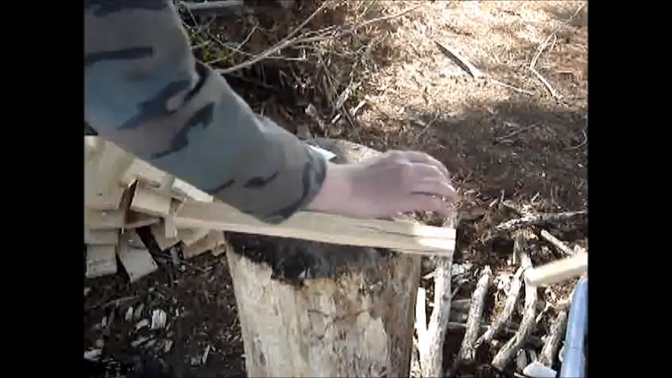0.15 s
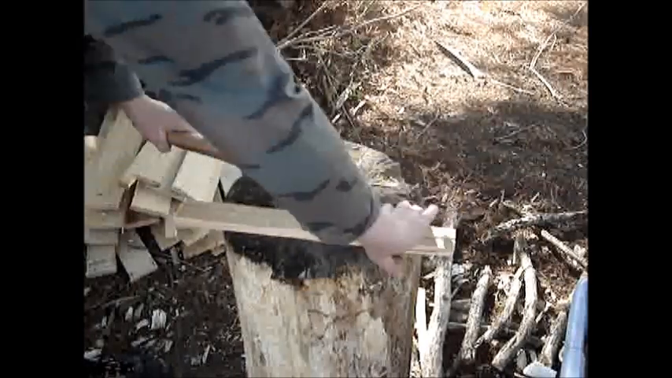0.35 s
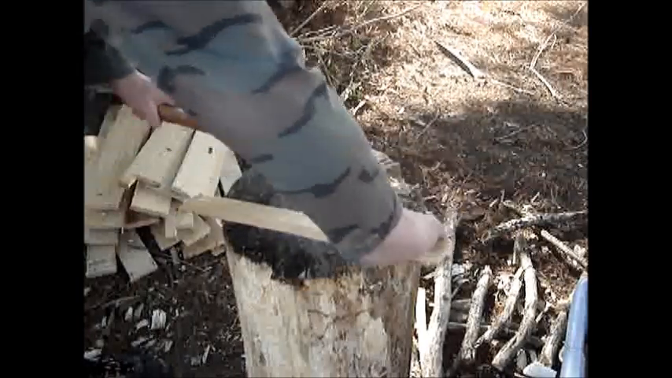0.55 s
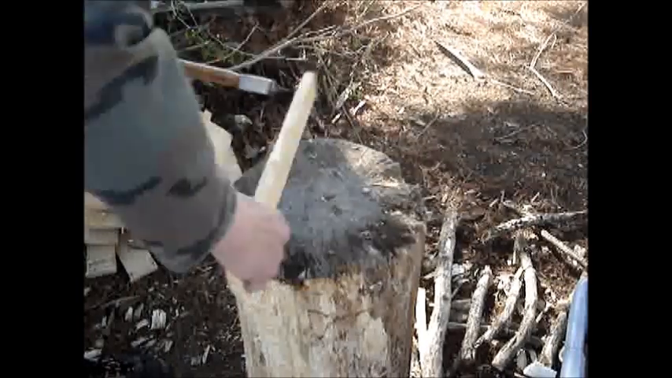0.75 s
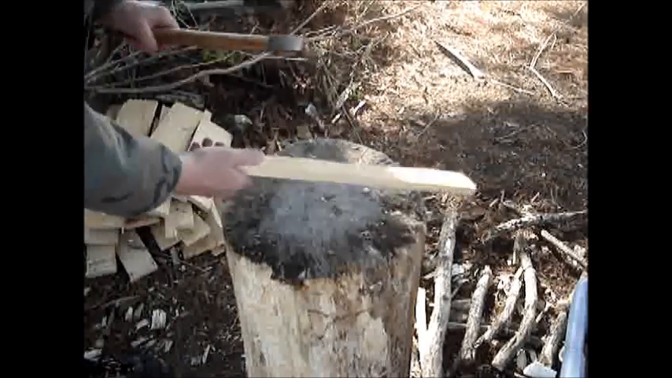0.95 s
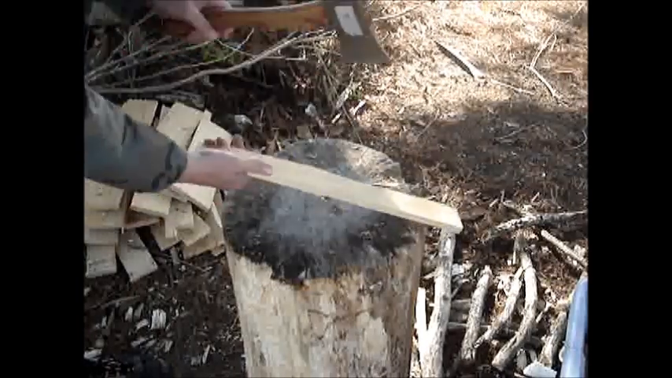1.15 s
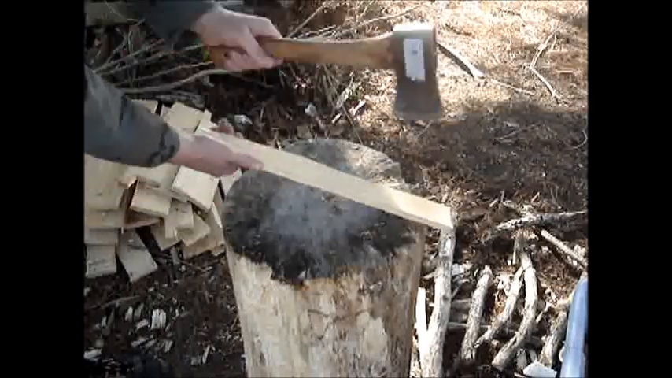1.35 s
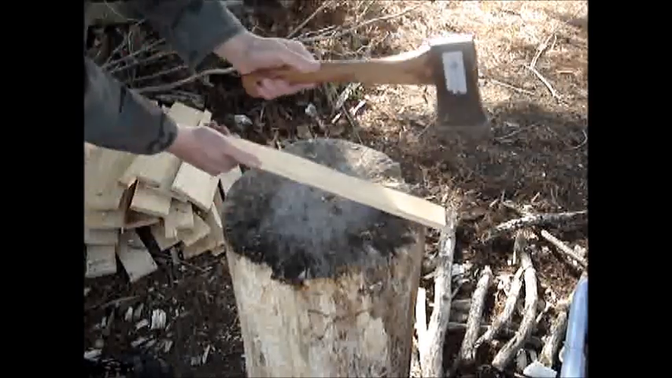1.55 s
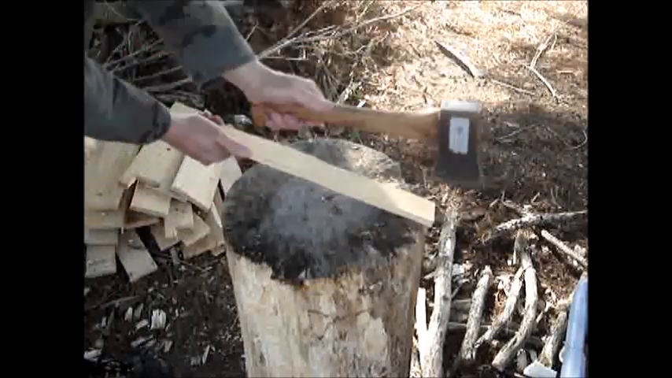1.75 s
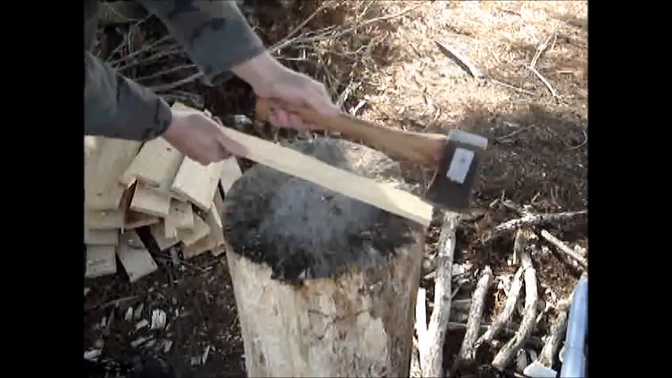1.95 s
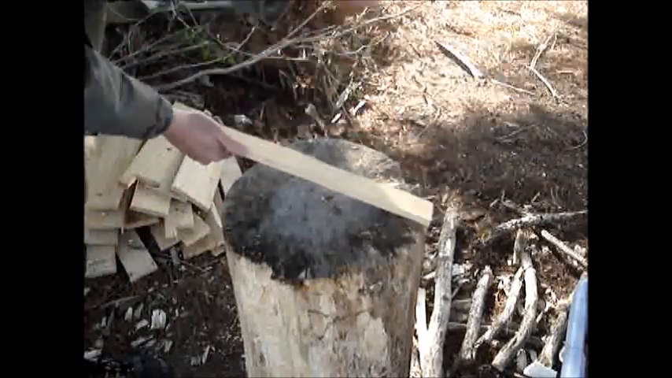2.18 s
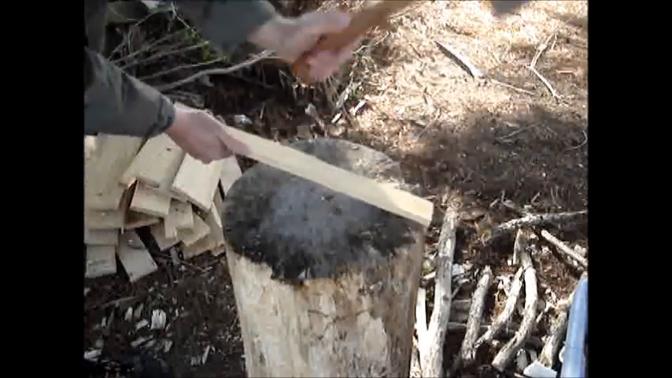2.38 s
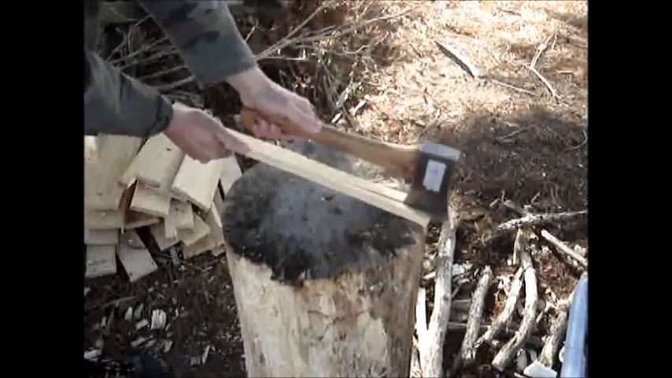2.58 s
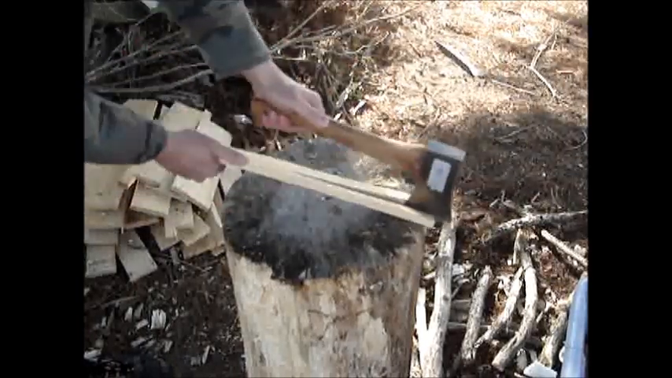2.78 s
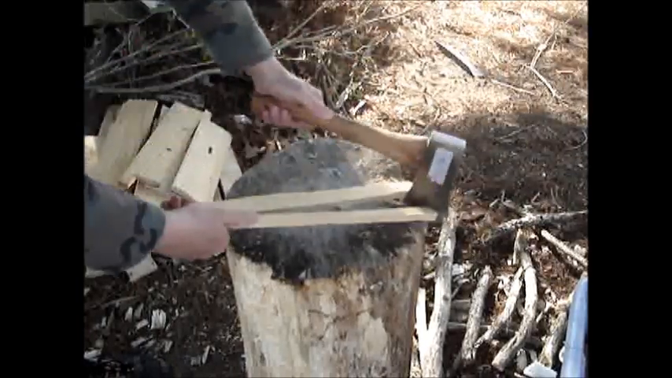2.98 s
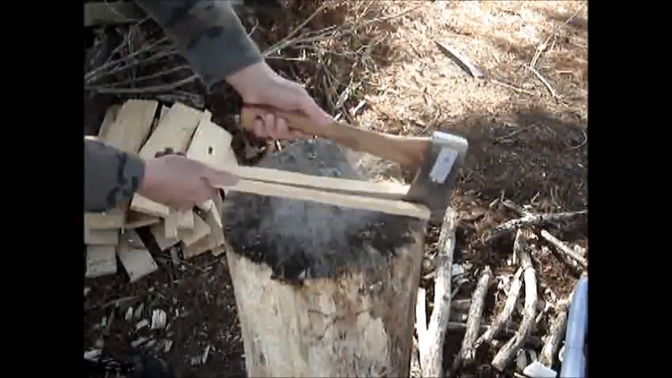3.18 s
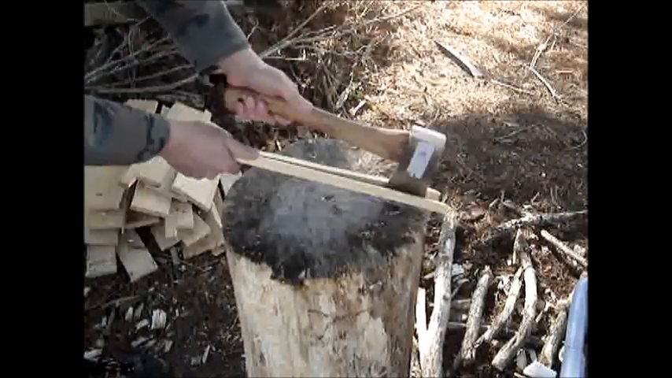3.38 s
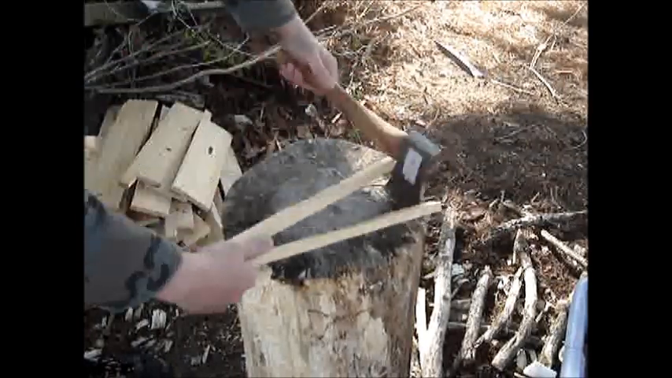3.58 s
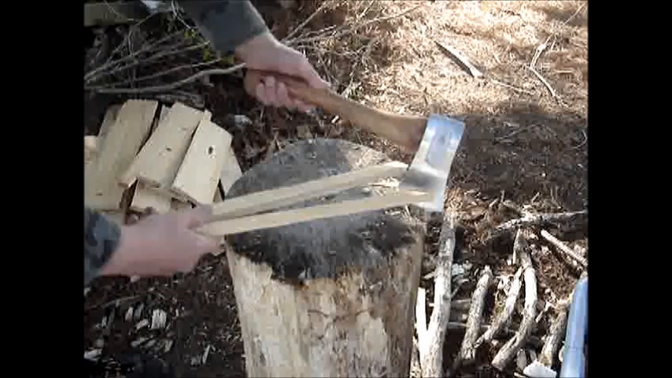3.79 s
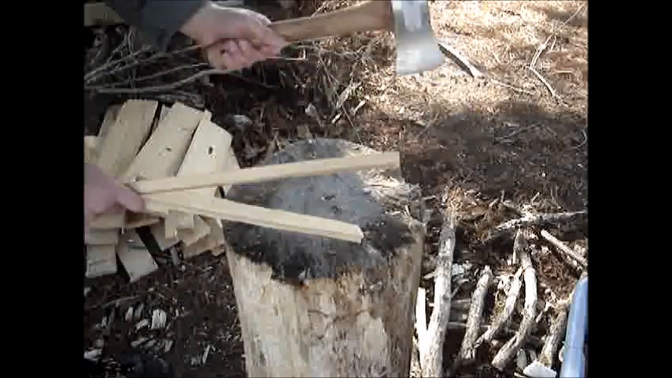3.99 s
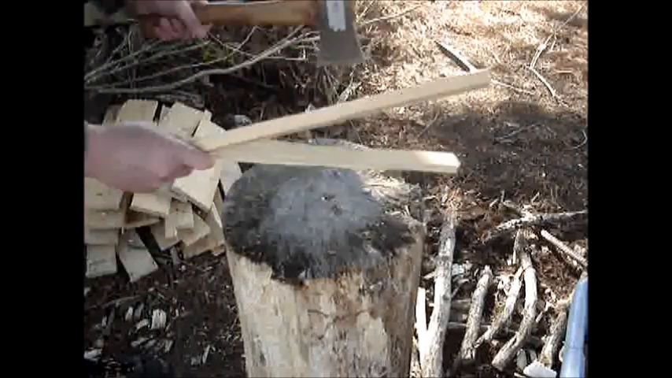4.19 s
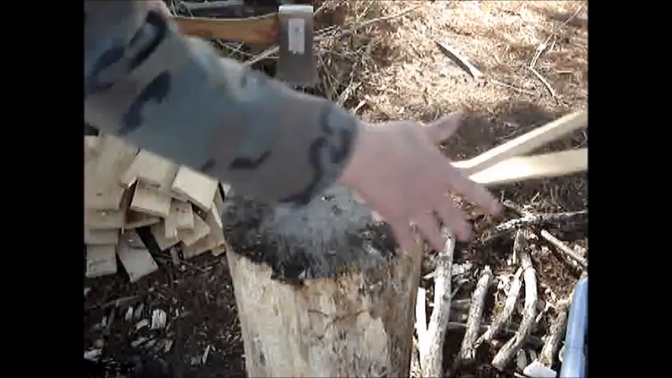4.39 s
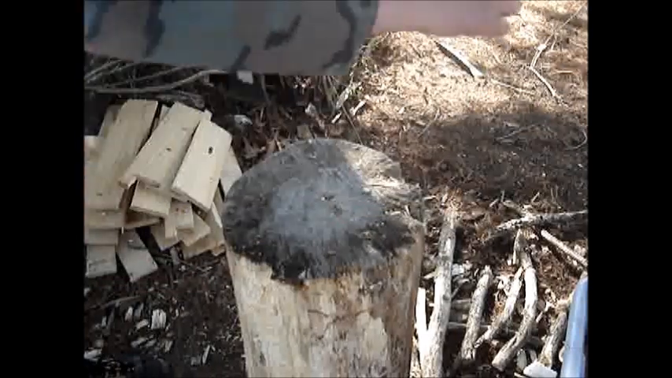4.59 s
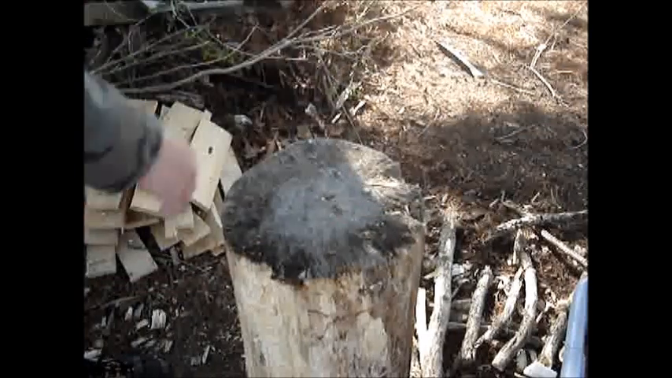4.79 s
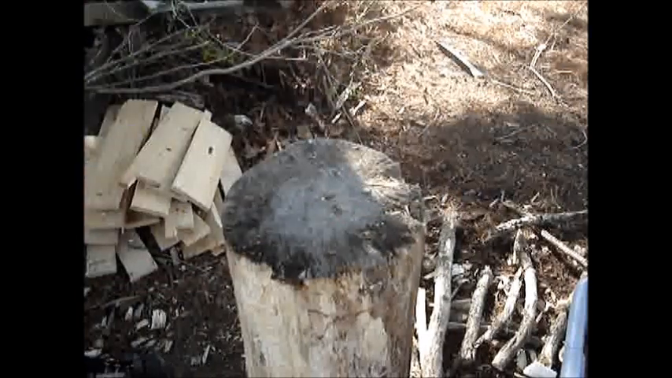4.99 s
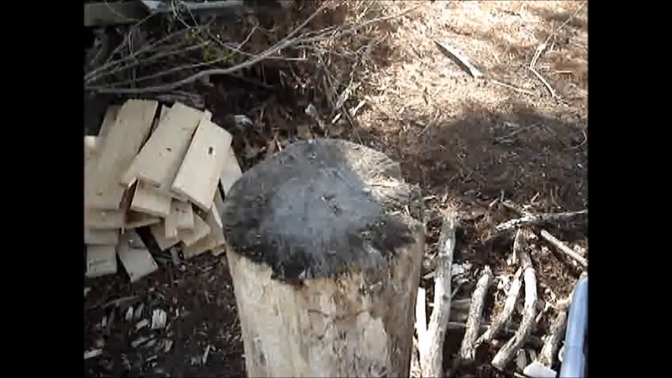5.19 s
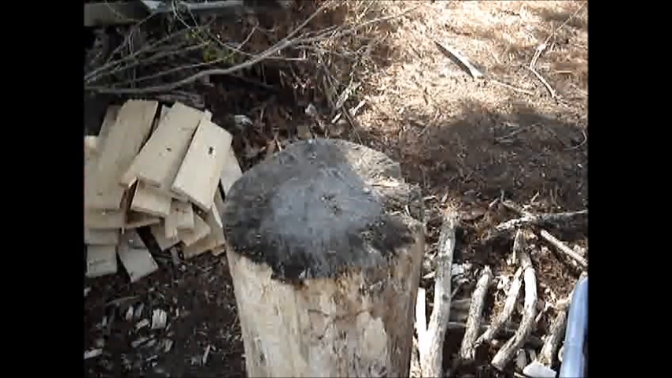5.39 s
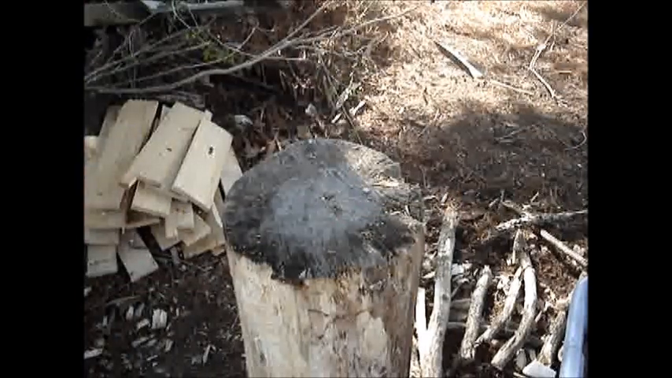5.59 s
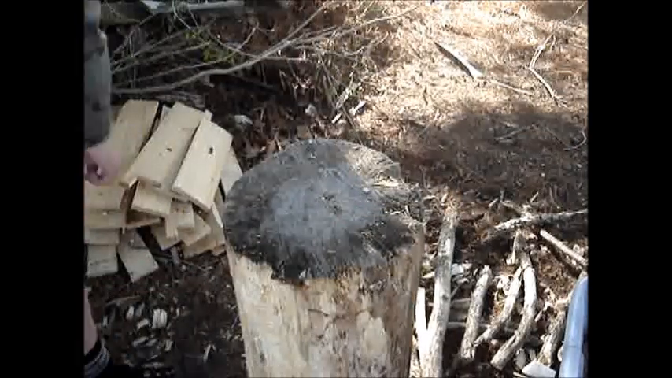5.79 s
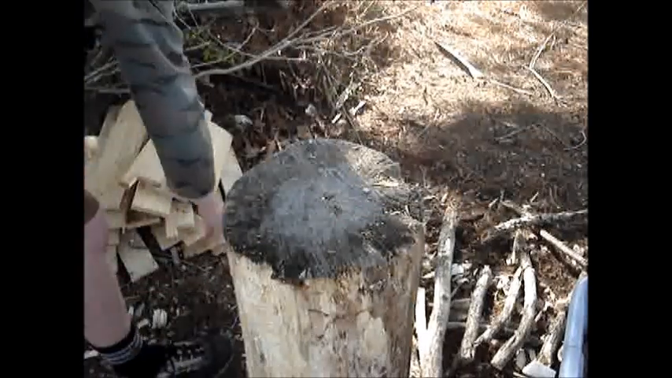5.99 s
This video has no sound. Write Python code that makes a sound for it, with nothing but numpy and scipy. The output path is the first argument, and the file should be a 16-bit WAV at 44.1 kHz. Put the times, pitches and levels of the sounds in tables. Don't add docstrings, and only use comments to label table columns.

```python
import sys
import numpy as np
from scipy import signal
from scipy.fft import rfft, irfft
from scipy.io import wavfile
from scipy.ndimage import uniform_filter1d

SR = 44100
rng = np.random.default_rng(int(sys.argv[2]) if len(sys.argv) > 2 else 0)


def invert_db(x):
    u = np.asarray(x, float) / 20
    return 10 ** u


def digitize_waveform(pressure):
    field = np.atleast_2d(pressure).T
    bounded = np.clip(field, -1, 1)
    quanta = np.round(bounded * 32767).astype(np.int16)
    wavfile.write(sys.argv[1], SR, quanta)


N = 266800
DELAY_S = 0.0012

# [f/Hz, rms level/dB]
WHINE = [(7883, -63.5), (8990, -80)]


def rms_one(x):
    return x / np.sqrt(np.mean(x ** 2) + 1e-20)


def in_time(rows):
    s, *columns = np.transpose(rows)
    t = np.arange(N) / SR
    span = uniform_filter1d(1. * (t > s[0]) * (t < s[-1]), size=200)
    return [np.interp(t, s, c) for c in columns] + [span]


def drift(rate):
    r = np.exp(-80 * np.pi * rate / SR)
    slow = signal.lfilter([1], [1, -2 * r, r * r], rng.standard_normal(N // 40 + 2002))[2000:]
    return np.interp(np.arange(N) / 40, np.arange(len(slow)), rms_one(slow))


def colour(x, spectrum):
    hz, db = np.transpose(spectrum)
    bins = np.maximum(np.arange(N // 2 + 1) * SR / N, 1)
    gain = invert_db(np.interp(np.log(bins), np.log(hz), db))
    return rms_one(irfft(rfft(x) * gain, N))


def ring(clicks, hz, t60):
    r, w = invert_db(-60 / (t60 * SR)), 2 * np.pi * hz / SR
    return signal.lfilter([0, np.sin(w)], [1, -2 * r * np.cos(w), r * r], clicks + 1e-18)


def band(x, hz, octaves):
    edges = np.clip(hz * 2. ** np.array([-octaves, octaves]), 20, .45 * SR)
    return signal.sosfilt(signal.butter(1, edges, "band", fs=SR, output="sos"), x)


def grains(per_s, spread_db):
    sizes = invert_db(spread_db * np.minimum(rng.exponential(1, N), 4)) * rng.choice([-1, 1], N)
    return rms_one(sizes * (rng.random(N) < per_s / SR))


def swell(rows, rise_db_s, fall_db_s):
    t = np.arange(N) / SR
    gain = 0
    for s, db, hold in rows:
        early, late = np.maximum(s - t, 0), np.maximum(t - s - hold, 0)
        gain = gain + invert_db(db - rise_db_s * early - fall_db_s * late)
    return gain


def add(out, s, sound, db):
    i = round((s + DELAY_S) * SR)
    out[i:i + len(sound)] += (invert_db(db) * sound / np.abs(sound).max())[:N - i]


def chops():
    # [t/s, peak level/dB, knock centre f/Hz, ring level/dB, bright edge level/dB]
    contacts = [(1.080, -10, 2000, -5.5, 1), (1.082, -10.5, 2580, -10, -30), (1.093, -16, 2620, -5.5, -25),
                (1.113, -26.5, 2830, -16, -24), (1.875, -0.5, 1680, -12, -48),
                (1.8779, -11, 3070, -12.5, -10), (1.8809, -21, 1500, -6, -14), (1.897, -29, 2280, 2.5, -30),
                (1.887, -18, 1690, -21, -34), (2.531, 0.5, 2130, -14.5, -17),
                (2.5484, -4, 2240, -13.5, -8.5), (3.526, -5.5, 3460, -19.5, -39),
                (3.537, -25.5, 1420, -25, -15), (3.976, -13, 1110, -29, -11.5),
                (3.987, -28, 1450, -29, -26)]
    # [f/Hz, level/dB, t60/s]
    board = [(584, -31, 0.15), (855, 10.5, 0.02), (1030, -0.5, 0.036), (1600, -10.5, 0.015),
             (1920, -40, 0.013), (1950, -23, 0.0055), (2400, -15, 0.0098), (2500, -20, 0.012),
             (3100, -17, 0.014), (4600, -45, 0.012)]
    # [t/s, peak level/dB, f/Hz]
    jolts = [
        (0.415, -32, 34.8),
        (1.081, -37, 39.7),
        (1.876, -65, 44.7),
        (2.533, -24, 34.6),
        (2.842, -43, 50.3),
        (2.887, -42, 50.3),
        (2.976, -40.5, 70.7),
        (3.524, -54, 40),
        (4.675, -34, 70.5),
        (4.7, -39, 40),
    ]
    blows = []
    for s, db, hz, ring_db, edge_db in contacts:
        t60 = 0.02 if db > -18 else 0.074
        blows.append((s, db, hz, t60, ring_db, edge_db))
    out = strike(blows, board, longest_s=0.05, reach_db=7.0)
    out += knocks(blows, octaves=1.0, pulse=5.4, edge_s=0.012)
    t = np.arange(SR // 8) / SR
    for s, db, hz in jolts:
        add(out, s, -np.sin(2 * np.pi * hz * t) * np.exp(-t * hz / 0.44), db)
    return out


def strike(blows, modes, longest_s, reach_db):
    out, rows = np.zeros(N), np.array(blows)
    places = ((rows[:, 0] + DELAY_S) * SR).astype(int)
    strengths_db = rng.normal(0, 2.7, (len(rows), len(modes)))
    for k, (hz, mode_db, t60) in enumerate(modes):
        clicks = np.zeros(N)
        octaves_away = np.abs(np.log2(hz / rows[:, 2]))
        clicks[places] = -invert_db(rows[:, 1] + rows[:, 4] + strengths_db[:, k] - reach_db * octaves_away)
        out += invert_db(.5 * mode_db) * ring(clicks, hz, min(t60, longest_s))
    return out


def knocks(blows, octaves, pulse, edge_s):
    out, t = np.zeros(N), np.arange(SR // 5) / SR - .003
    for s, db, hz, t60, _, edge_db in blows:
        noise = rng.standard_normal((2, len(t)))
        lead_in = np.where(t < 0, .05 * np.exp(t / .002), 1)
        dying, lingering = invert_db(-60 * np.abs(t) / t60), invert_db(-20 * np.abs(t) / t60)
        rough = lead_in * (noise[0] * dying + 0.15 * noise[1] * lingering)
        rough[np.argmax(t >= 0)] -= pulse
        rough = signal.sosfilt(signal.butter(3, 2 * hz, fs=SR, output="sos"), rough)
        body = band(band(band(rough, hz, octaves), hz, octaves), 1500, 1.6)
        add(out, s + t[0] - .2 / hz, body, db)
        edge = lead_in * noise[1] * invert_db(-60 * np.abs(t) / edge_s)
        add(out, s + t[0], band(band(edge, 5400, 0.88), 3500, 0.36), db + edge_db)
    return out


def splitting():
    # [t/s, level/dB, hold/s]
    tear = [
        (2.531, -15, .014),
        (2.55, -10.5, 0.0012),
        (2.6, -47, 0.0084),
    ]
    # [f/Hz, level per Hz/dB]
    torn = [(180, -86), (300, -33), (762, -9), (924, -18.5), (1380, -2), (1640, -9.5), (2210, -3.5),
            (6420, -25), (10300, -46), (13400, -69), (22000, -120)]
    # [t/s, peak level/dB, centre
    # f/Hz]
    snaps = [(2.798, -29, 3400), (2.811, -11, 4600), (2.8205, -25, 5300), (2.8238, -17, 6500),
             (2.8296, -11, 3700), (2.8367, -19, 2900), (2.8405, -15, 4600), (2.8432, -16, 3900),
             (2.848, -21, 3770), (2.854, -23, 4200), (2.8602, -9, 4400), (2.8672, -9, 3750),
             (2.8737, -11, 3900), (2.8846, -11, 5000), (2.8892, -9, 4300), (2.9082, -11.5, 3750),
             (2.918, -10, 5100), (2.9215, -17, 4200), (2.93, -27, 5500), (2.9392, -14, 3100),
             (2.9722, -9, 4200), (2.979, -28, 3000),
             (2.543, -10, 2640), (2.561, -17, 2270), (2.5825, -39, 2600), (2.596, -30, 1700),
                  (2.613, -36, 2200), (2.632, -33, 2800), (3.2124, -35.5, 2740), (3.3155, -34, 4550),
                  (3.3215, -25, 4150), (3.543, -17.5, 3600), (3.575, -21.5, 6900), (3.5967, -21.5, 3300),
                  (3.603, -23.5, 2700), (3.615, -36, 3060), (3.6473, -33, 3200), (3.806, -33, 4220),
                  (3.8925, -27, 4000), (3.945, -28, 3660), (3.9546, -31, 3680), (4.3736, -36, 2750)]
    # [t/s, level/dB, hold/s]
    strain = [(.03, -53, 0.11), (2.822, -38, 0.035), (2.88, -43.5, 0.0033), (2.925, -43, 0.0094),
              (2.952, -47.5, 0.0077), (2.995, -74, 0.011), (3.03, -76, .012), (3.32, -51, 0.066),
              (3.54, -47.5, 0.089), (3.8, -52, 0.043), (3.95, -54, 0.01), (4.37, -58.5, 0.0063)]
    tearing = colour(grains(5000, spread_db=3.5), torn)
    out = swell(tear, rise_db_s=3994, fall_db_s=345) * invert_db(-8.0) * tearing
    t = np.arange(SR // 25) / SR
    peak_s, spread_s = 0.002, 0.0012
    tail = 0.12 * (t > peak_s) * np.exp(-t / 0.005)
    for s, db, hz in snaps:
        burst = rng.standard_normal(len(t)) * (np.exp(-.5 * ((t - peak_s) / spread_s) ** 2) + tail)
        splinter = band(band(burst, hz, 0.58), hz, 0.58) * 4.0
        crack = band(band(band(burst, 4800, 1.0), 4800, 1.0), 4800, 1.1) * .7
        add(out, s, splinter + crack, db)
    crackle = band(band(grains(8100, spread_db=-0.5), 3200, 0.79), 3200, 0.79)
    crackle = rms_one(band(crackle, 3500, 1.0))
    return out + swell(strain, rise_db_s=514, fall_db_s=188) * crackle


def pile():
    # [t/s, peak level/dB, knock centre f/Hz, ring level/dB]
    landing_1 = [(.386, -7, 1100, -4), (.388, -5, 2600, -9), (.3925, -18, 1500, -14),
                 (.3965, -11.5, 1300, -0.5), (.402, -13, 1050, 4.5), (.4112, -9, 2700, -6),
                 (.4135, -6, 1250, -2), (.415, -20.5, 3030, 10.5), (.4229, -19.5, 3030, 3),
                 (.418, -10, 1950, 4.5), (.4215, -10, 1000, -0.5), (.428, -15.5, 2000, 7),
                 (.436, -8, 810, -3), (.4455, -20.5, 3000, -5), (.449, -15, 1000, -2),
                 (.463, -19, 1100, 3.5), (.482, -29, 1190, -2), (.511, -31, 713, 0), (.516, -26, 694, 0),
                 (.5585, -12.5, 2060, -10), (.561, -33.5, 3100, 14), (.604, -19, 1000, -6),
                 (.607, -24.5, 2550, -4), (.636, -18.5, 1070, 3), (.639, -29.5, 1000, -7),
                 (.844, -28, 1040, 2.5), (.866, -37, 3420, -32)]
    landing_2 = [(4.67, -16, 2270, -2), (4.672, 0.5, 1880, -9), (4.684, -23, 1850, -3),
                 (4.699, -11.5, 2850, -4), (4.701, -2.5, 2410, -4.5), (4.704, -8, 1050, -3),
                 (4.708, -6, 2200, 0.5), (4.711, -14, 4000, 1), (4.717, -14, 2630, 2.5),
                 (4.7195, -12, 3100, 1), (4.7255, -17.5, 1830, 3), (4.730, -7, 1830, 1.5),
                 (4.737, -24, 4300, 1), (4.7455, -8.5, 1390, -2), (4.748, -22, 3900, -2),
                 (4.756, -21, 3300, -9), (4.75, -15, 1050, 2.5), (4.766, -18, 3430, -12),
                 (4.795, -29, 2000, -10), (4.868, -15.5, 1410, -15), (4.896, -38, 1530, -18),
                 (4.926, -21, 900, -12), (4.931, -21, 970, -18), (4.938, -30, 3300, -12),
                 (4.944, -27, 2500, -17), (4.954, -31, 900, -8), (4.971, -9.5, 1970, -11.5),
                 (4.98, -15.5, 1100, -6.5), (5.298, -33, 1880, -5), (5.310, -27.5, 1080, -1)]
    stick_1_hz = [673, 1032, 1240, 1593, 1975, 2256, 2573, 2762, 3032, 3262, 4375, 5798]
    stick_2_hz = [756, 956, 1036, 1231, 1831, 1972, 2480, 2948, 3036, 3262, 3860, 4377]
    # [level/dB, t60/s]
    stick_1 = [(2, 0.05), (-14, .12), (-31, 0.088), (-33, 0.083), (-4.5, 0.069), (-46, .06), (-23, .06),
               (-32, .06), (1, 0.072), (-24, .07), (-21, 0.074), (-46, .047)]
    stick_2 = [(-28, 0.12), (-16, 0.17), (-14.5, 0.19), (-34, .06), (-10, 0.09), (-14, .07), (-9, 0.032),
               (-22, 0.038), (-8, 0.053), (-11, 0.07), (-14, 0.051), (-14, 0.045)]
    # [t/s, level/dB, hold/s]
    settle_1 = [
        (0.389, -22.5, .001),
        (0.414, -27, 0.052),
    ]
    settle_2 = [
        (4.675, -12, 0.0084),
        (4.708, -17.5, 0.043),
        (4.933, -21.5, 0.012),
    ]
    out = stick(bounces(landing_1, -16.5), stick_1_hz, stick_1, settle_1, chatter_db=-33, rattle_db=-12.5)
    out += stick(bounces(landing_2, -33), stick_2_hz, stick_2, settle_2, chatter_db=-35.5, rattle_db=-19)
    return signal.sosfilt(signal.butter(2, 170, "high", fs=SR, output="sos"), out)


def stick(landing, modes_hz, rings, settles, chatter_db, rattle_db):
    modes = [(hz, *row) for hz, row in zip(modes_hz, rings)]
    out = strike(landing, modes, longest_s=0.2, reach_db=21.5)
    out += knocks(landing, octaves=1.0, pulse=4.7, edge_s=0.012)
    chatter = swell(settles, rise_db_s=2497, fall_db_s=463) * grains(2300, spread_db=5.0)
    for hz, mode_db, t60 in modes:
        out += invert_db(chatter_db + .5 * mode_db) * ring(chatter, hz, min(t60, .08))
    rattle = np.zeros(N)
    for k, hz in enumerate(np.geomspace(450, 5200, 18)):
        rattle += ring(chatter, hz, 10.1 / hz) * (-1) ** k
    return out + invert_db(rattle_db) * band(rattle, 1550, 0.87)


def bounces(rows, edge_db):
    return [(s, db, hz, (23.5 - 4 * db) / hz, ring_db, edge_db) for s, db, hz, ring_db in rows]


def offcut():
    # [t/s, peak level/dB, knock centre f/Hz, ring level/dB]
    drop = [
        (5.121, -26.5, 2120, -2),
    ]
    # [f/Hz, level/dB, t60/s]
    modes = [(492, 5, 0.11), (1280, 19, 0.029), (2000, -17, 0.09), (3400, -7, 0.051), (4750, 0, 0.019)]
    blows = bounces(drop, -22)
    return strike(blows, modes, longest_s=0.13, reach_db=3.5) + knocks(blows, octaves=0.99, pulse=1.6, edge_s=0.019)


def thuds():
    # [t/s, peak level/dB, f/Hz]
    hollows = [
        (0.603, -25.5, 357),
        (0.639, -31, 340),
        (2.976, -35.5, 590),
        (4.87, -30.5, 350),
        (4.976, -35.5, 326),
    ]
    out = np.zeros(N)
    for s, db, hz in hollows:
        add(out, s, band(ring(signal.unit_impulse(SR // 8), hz, 0.02), hz, 0.73), db)
    return out


def bright_hiss():
    # [t/s, level/dB, hold/s]
    hiss_swells = [
        (.39, -51, 0.087),
        (.57, -53, 0.057),
        (2.995, -50, 0.015),
        (4.675, -49, .11),
        (4.87, -49.5, 0.15),
    ]
    thin_hiss = rms_one(band(band(grains(9800, spread_db=2.5), 6300, 0.33), 6300, 0.33))
    return swell(hiss_swells, rise_db_s=2001, fall_db_s=257) * thin_hiss


def trees(x):
    t = np.arange(SR // 2) / SR
    scatter = band(rng.standard_normal(len(t)), 900, 1.0) * invert_db(-60 * t / 0.51) * np.minimum(t / 0.013, 1)
    return invert_db(-29) * signal.fftconvolve(x, scatter / np.sqrt(np.sum(scatter ** 2)))[:N]


def birds():
    # [t/s, length/s, from f/Hz, to f/Hz, level/dB]
    fading = [
        (-.005, .117, 3490, 3330, -50),
        (.112, .07, 3300, 3360, -56),
        (.17, .15, 3335, 3320, -60),
        (5.205, .08, 6570, 6610, -59),
    ]
    # [t/s, length/s, from f/Hz, to f/Hz, level/dB]
    trills = [
        (5.48, 0.051, 6700, 7200, -53),
        (5.745, .065, 6500, 7200, -52),
        (6.005, .05, 6600, 7200, -49),
        (5.97, 0.036, 4400, 4750, -55),
    ]
    out = whistles(fading, fade_db_s=18, flutter_db=-2.5) + pipes()
    for s, length, from_hz, to_hz, db in trills:
        t = np.arange(round(length * SR)) / SR
        warble_hz = 260 * np.sin(2 * np.pi * 130 * t)
        hz = from_hz + (to_hz - from_hz) * t / length + warble_hz
        add(out, s, np.sqrt(np.sin(np.pi * t / length)) * np.sin(2 * np.pi * np.cumsum(hz) / SR), db)
    return out


def whistles(notes, fade_db_s, flutter_db):
    out = np.zeros(N)
    rise_s, fall_s, flutter_hz = 0.034, 0.0081, 16
    for s, length, from_hz, to_hz, db in notes:
        t = np.arange(N) / SR - s
        on = np.clip(t / rise_s, 0, 1) * np.clip((length - t) / fall_s, 0, 1)
        flutter = np.cos(2 * np.pi * flutter_hz * (t - rise_s)) - 1
        hz = np.interp(t, [0, length], [from_hz, to_hz])
        level_db = db - fade_db_s * np.maximum(t, 0) + flutter_db * flutter + 1.8 * drift(20)
        out += on * np.sqrt(2) * invert_db(level_db) * np.sin(2 * np.pi * np.cumsum(hz) / SR)
    return out


def pipes():
    # [t/s, f/Hz, level/dB]
    piped = [
        [(5.31, 2657, -64), (5.342, 2642, -47), (5.386, 2690, -52), (5.426, 2633, -45), (5.45, 2670, -57),
         (5.458, 2678, -53), (5.526, 2659, -61), (5.54, 2642, -67)],
        [(5.57, 2610, -66), (5.586, 2600, -53), (5.616, 2656, -44), (5.638, 2630, -52), (5.664, 2694, -40.5),
         (5.716, 2646, -58), (5.746, 2700, -43), (5.778, 2610, -63), (5.785, 2678, -66)],
        [(5.84, 2660, -73), (5.854, 2691, -47), (5.876, 2700, -38), (6.018, 2680, -45), (6.05, 2675, -56)],
    ]
    out, waver_db = np.zeros(N), 2.2 * drift(25)
    for note in piped:
        hz, db, on = in_time(note)
        out += on * np.sqrt(2) * invert_db(db + waver_db) * np.sin(2 * np.pi * np.cumsum(hz) / SR)
    return out


def engine():
    # [t/s, firing f/Hz, level/dB]
    load = [
        (0, 99.6, -56),
        (.7, 100, -60),
        (1.3, 99, -61),
        (1.8, 106.5, -52),
        (2.2, 116.6, -52.5),
        (2.6, 129, -60),
        (2.9, 134.6, -60),
        (3.4, 121, -87),
    ]
    hz, db, on = in_time(load)
    turns = 2 * np.pi * np.cumsum(hz * (1 + 0.0193 * drift(5.3))) / SR
    tone_gain = invert_db(db + 2.2 * drift(2.7))
    return on * tone_gain * (np.sin(turns) + 0.71 * invert_db(1.2 * drift(8)) * np.sin(2 * turns))


def air():
    # [t/s, level/dB]
    traffic = [(0, -45), (.7, -47.5), (1.3, -44.5), (1.9, -44), (2.4, -43), (2.65, -47.5), (3.1, -52.5),
               (3.7, -51), (4.2, -50.5), (4.6, -47), (5.1, -45), (5.5, -45), (5.9, -43.5), (6.05, -44.5)]
    # [f/Hz, level per Hz/dB]
    rumble = [(12, -45), (20, -22), (38, -11), (129, 1), (171, 1.5), (227, 4.5), (270, 1), (330, 4),
              (430, -7), (730, -120)]
    roar = [(160, -32), (280, -15), (409, -3.5), (593, -1.5), (646, -0.5), (1060, 0.5), (1180, -2),
            (1290, -3.5), (2200, -21), (2860, -52), (4840, -120)]
    hiss = [(1300, 2.5), (1900, 5.5), (3000, 0.5), (4500, -2.5), (6500, -4.5), (8500, -3), (10400, -17)]
    roar_db, _ = in_time(traffic)
    swing_db = roar_db - roar_db.mean()
    white = rng.standard_normal((3, N))
    out = invert_db(-56.5 + 1.4 * swing_db + 0.29 * drift(7.3)) * colour(white[0], rumble)
    out += invert_db(roar_db + 1.08 * drift(2.5)) * colour(white[1], roar)
    out += invert_db(-52.5 + 0.31 * swing_db + 0.32 * drift(1.9)) * colour(white[2], hiss)
    for hz, db in WHINE:
        out += np.sqrt(2) * invert_db(db + 1.2 * drift(20)) * np.sin(2 * np.pi * hz * np.arange(N) / SR)
    return out


def scene():
    near = pile() + chops() + splitting() + thuds() + bright_hiss()
    near = signal.sosfilt(signal.butter(2, 40, "high", fs=SR, output="sos"), near)
    near += offcut()
    echo = band(np.r_[np.zeros(130), near[:-130]], 1500, 1.5)
    return (near + invert_db(-29.5) * echo + air() + engine() + birds() + trees(near))[None]


def starve(x):
    gap_before = [.387, .604, 1.079, 1.874, 2.81, 2.972, 3.524, 3.576, 4.67, 4.969]
    gap_after = [1.874, 1.884, 2.968, 3.972, 4.974, 5.124]
    gap_between = [2.795, 2.86, 2.909, 3.597]
    gap_clatter = [.411, 4.699, 4.718]
    lead_s, lag_s = 0.021, 0.014
    out = x.copy()
    # blows, start of the gap and its length in s, how much wider the kept band is
    for blows, shift_s, span_s, wider in ((gap_before, -lead_s, lead_s, 1),
                                          (gap_between, -lead_s / 2, lead_s / 2, 1.5),
                                          (gap_clatter, -lead_s / 2, lead_s / 2, 3.4),
                                          (gap_after, lag_s, lag_s + lead_s / 4, 2.5)):
        for s in blows:
            peak_db = 20 * np.log10(np.abs(x[round(s * SR):round((s + lag_s) * SR)]).max())
            hz = wider * 1300 * 2 ** min(-peak_db / 8, 2 / wider ** 2)
            i, j = round((s + shift_s) * SR), round((s + shift_s + span_s) * SR) - 44
            low_pass = signal.butter(6, hz, fs=SR, output="sos")
            lows = signal.sosfiltfilt(low_pass, out[i - 400:j + 400])[400:-400]
            ramp = np.arange(j - i)
            fade = np.minimum(1, np.minimum(ramp, ramp[::-1]) / 60)
            out[i:j] -= .94 * fade * (out[i:j] - lows)
    return out


def holes(x, calm, busy, faint_db):
    hz, _, cells = signal.stft(x, SR, nperseg=512)
    loud = uniform_filter1d(np.abs(cells[20:100]).mean(axis=0), size=9)
    chance = np.where(loud > 3 * np.median(loud), busy, calm)
    dropped = rng.random((len(hz) // 8 + 1, len(loud) // 2 + 1))
    dropped = np.kron(dropped, np.ones((8, 2)))[:len(hz), :len(loud)] < chance
    faint = uniform_filter1d(np.abs(cells), size=8, axis=0) < invert_db(faint_db)
    spared = (hz < 4000) | (np.abs(hz - WHINE[0][0]) < 300)
    return signal.istft(cells * ~(dropped & faint & ~spared[:, None]), SR, nperseg=512)[1][:N]


def top_cut(x):
    return signal.sosfilt(signal.butter(12, 11200, fs=SR, output="sos"), x)


def record(dry):
    thinned = holes(starve(dry[0]), calm=.03, busy=.35, faint_db=-68)
    rounded = 1.3 * np.tanh(thinned[None] / 1.3)
    cut = signal.sosfilt(signal.ellip(10, .5, 65, 10050, fs=SR, output="sos"), rounded)
    return top_cut(cut)


dry = scene()
out = record(dry)
digitize_waveform(out)
```